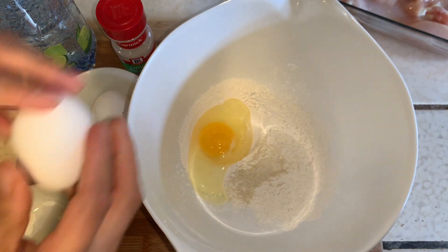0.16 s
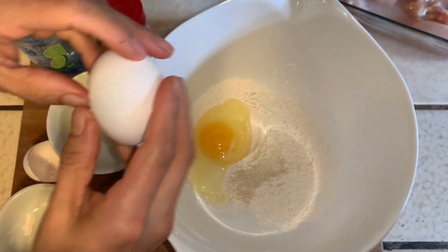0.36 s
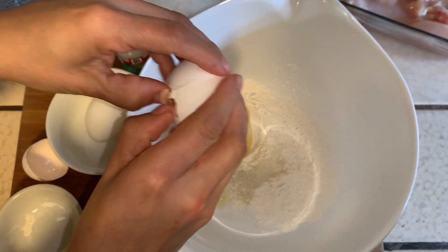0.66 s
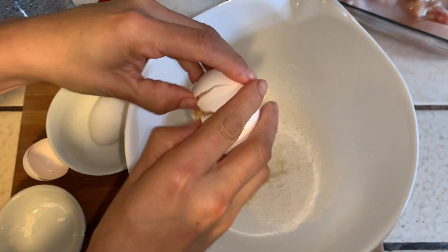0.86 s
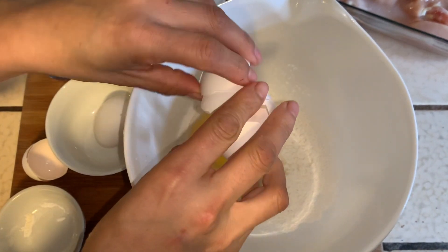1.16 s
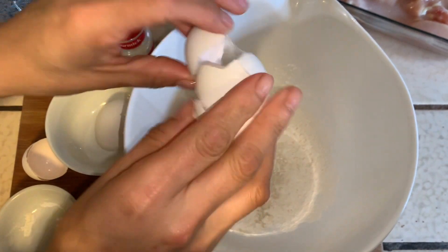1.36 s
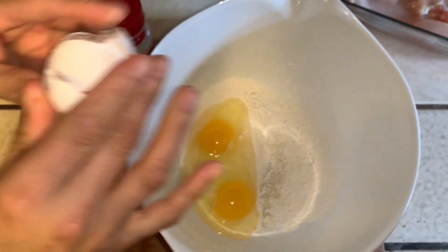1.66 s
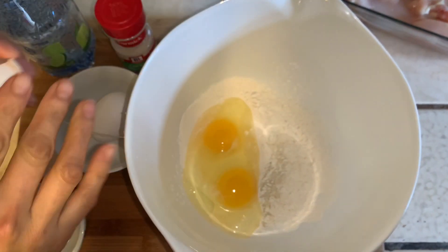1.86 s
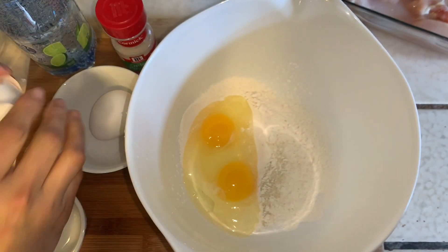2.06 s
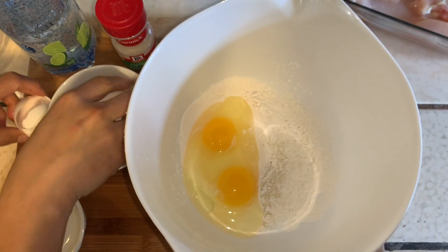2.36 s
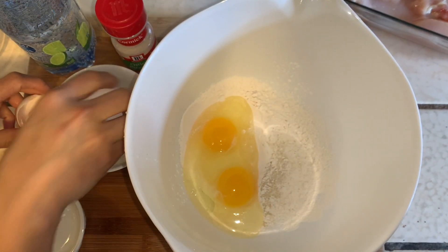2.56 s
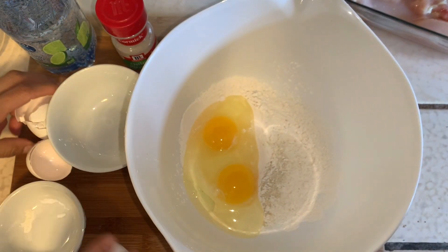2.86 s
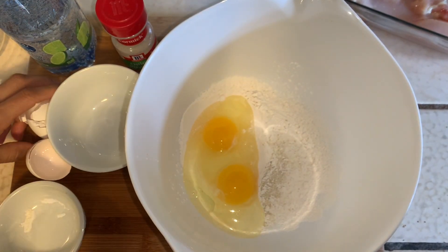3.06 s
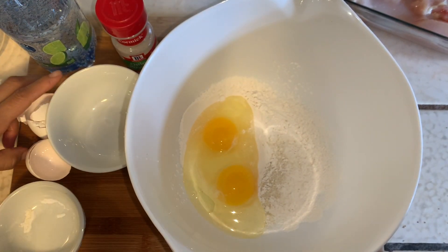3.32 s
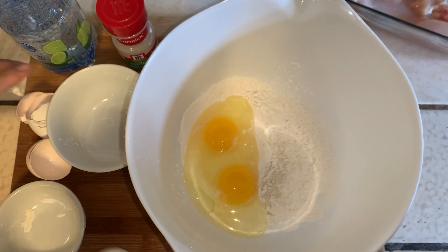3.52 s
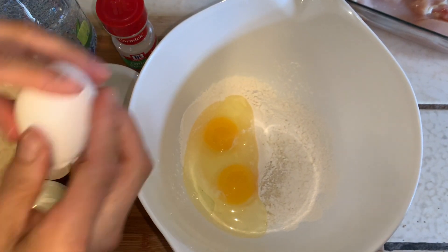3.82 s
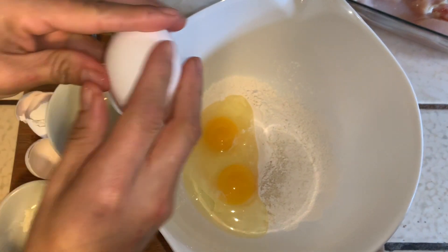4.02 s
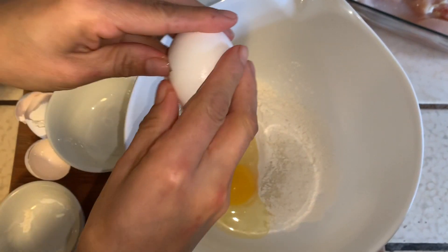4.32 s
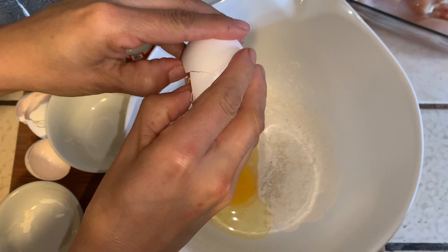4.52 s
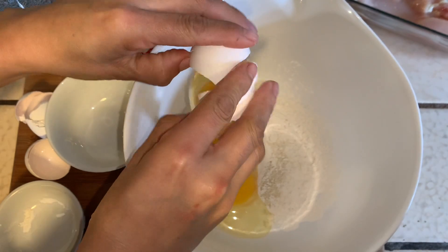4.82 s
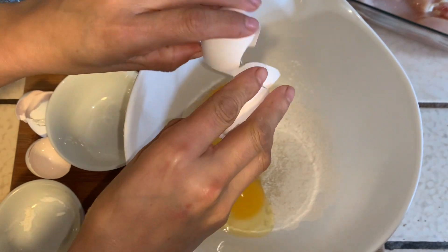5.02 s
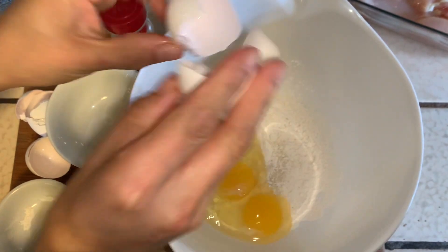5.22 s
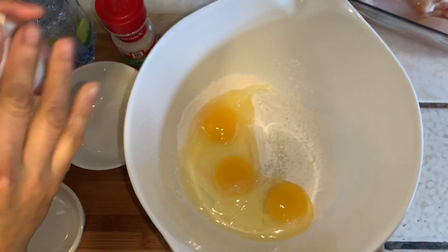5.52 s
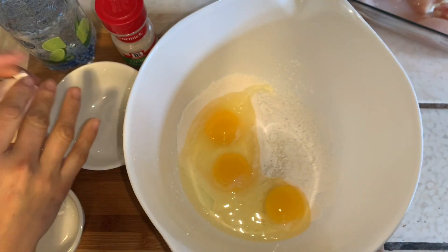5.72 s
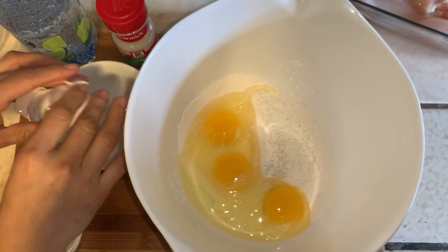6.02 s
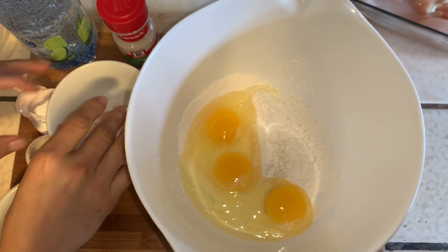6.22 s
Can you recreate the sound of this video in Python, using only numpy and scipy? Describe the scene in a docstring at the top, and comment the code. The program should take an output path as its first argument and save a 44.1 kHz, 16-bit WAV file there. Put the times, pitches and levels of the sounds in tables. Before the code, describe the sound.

Close, brittle eggshell snaps and rasps, a brief lull, three solid egg taps, then more splitting shells, soft bumps and a tiny bowl clink.

```python
"""Eggs cracked in a quiet kitchen

An egg is knocked three times on the counter; hands split shells with sharp snaps, crunches, rasps and crackle.
Breaks are noise bursts that drive shell resonances; knocks excite egg, board and counter modes.
Soft bumps, one bowl clink and a short room tail join them over low rumble and hiss; the loudest peaks clip."""
import sys
import numpy as np
from scipy import signal
from scipy.fft import rfft, irfft, next_fast_len
from scipy.io import wavfile
from scipy.ndimage import map_coordinates

SR = 44100
rng = np.random.default_rng(int(sys.argv[2]) if len(sys.argv) > 2 else 0)


def master(y):
    """Save y as 16-bit WAV."""
    cut = np.clip(np.atleast_2d(y).T, -1, 1)
    pcm = np.round(cut * 32767)  # scale
    wavfile.write(sys.argv[1], SR, pcm.astype(np.int16))


N = 281344

# Event level_db is the peak before the stereo stage; rise_s is the time of a 20 dB rise.
# Building rumble spectrum: freq_hz, density_db (relative, per Hz)
RUMBLE_SPECTRUM = [(12, -66), (20, -42), (38, -6), (90, -2), (136, -10), (171, -25.5), (221, -19.5),
                   (376, -25.5), (422, -31), (544, -26.5), (702, -43.5), (905, -36.5), (1580, -47),
                   (1730, -50.5), (5000, -68.5), (6500, -82), (11000, -120)]
RUMBLE_RMS_DB, HISS_RMS_DB, SWELL_RATE_HZ = -29, -60, 6
# Room decay: freq_hz, t60_s
ROOM_DECAY = [(150, 0.29), (1000, 0.31), (4000, 0.37), (12000, 0.16)]
# Small glazed bowl: freq_hz, level_db, t60_s
BOWL_MODES = [(4510, -34, 0.63), (8100, -28, 0.11)]
CLINK_START_S = 6.209
# Soft bumps and brushes of hands and bowls on the board, and empty shell halves set down on each other near
# 5.7-6.1 s: peak_s, level_db, nominal_pitch_hz, rise_s, t60_s
SOFT_BUMPS = [(.825, -27, 470, 0.0016, 0.22), (1.537, -26.5, 304, 0.0029, 0.053),
              (1.994, -41.5, 1830, 0.033, 0.18), (4.385, -24.5, 326, .003, 0.07),
              (4.745, -32, 500, .002, 0.078), (4.889, -26.5, 360, 0.0027, 0.12),
              (5.04, -32, 1050, 0.14, 0.31), (5.608, -35, 535, 0.04, 0.17),
              (5.618, -18.5, 235, 0.058, 0.14), (5.71, -16.5, 590, 0.0011, 0.045),
              (5.723, -15.5, 960, 0.0031, 0.1), (6.061, -10, 525, 0.0013, 0.058),
              (6.063, -13, 1310, 0.0033, .06), (6.11, -10.5, 1280, 0.00205, 0.082)]

# Egg against the counter: contact_s, level_db, thud_rel_db, board_rel_db, slap_rel_db
EGG_KNOCKS = [(2.965, 10, -12, -7.5, -21.5), (3.148, 4, -9, 0, -9), (3.333, -5.5, 1.5, 1, -11)]
# Slab and cabinet: freq_hz, mean_level_db, undamped_t60_s
SLAB_MODES = [(69, -4.5, 0.19), (98.4, 1.5, 0.2), (116.5, -10.5, 0.4), (170, -0.5, 0.21)]
# Egg and counter surface: freq_hz, level_db, t60_s
SURFACE_MODES = [(910, -2, 0.024), (1065, 9, 0.033), (1173, 10.5, 0.027), (1405, -2, 0.12),
                 (1550, -13, 0.028), (1820, -25, 0.018), (2180, -30, 0.036)]
# Cutting board: freq_hz, level_db, t60_s
BOARD_MODES = [(216, -8, 0.074), (311, -1, 0.057), (399, 4, 0.039), (463, 1.5, 0.04), (610, -31, 0.024),
               (752, -18, 0.013)]

# Hands at work, one list per egg: time_s, bright_crackle_db, hollow_crackle_db, cavity_hz
HANDLING = [
    [(0, -66, -52.5, 2520), (.17, -63, -49, 2080), (.32, -80, -68, 1440), (.4, -56, -47.5, 2770),
     (.57, -55, -38.5, 2130), (.77, -55.5, -37, 2410), (.9, -63.5, -44, 1770), (1.03, -35.5, -40, 1565),
     (1.1, -44, -51, 1600), (1.2, -38, -31.5, 1800), (1.35, -46, -42.5, 1670), (1.5, -34, -23, 1750),
     (1.62, -53, -50.5, 1980), (1.72, -28, -48.5, 2060), (1.8, -83, -74, 2180), (1.95, -61, -69.5, 1770),
     (2.1, -65, -63, 1760), (2.2, -66, -52, 2250), (2.32, -39, -37.5, 2060), (2.45, -71, -65, 1580),
     (2.93, -84.5, -56, 1700)],
    [(3.6, -70, -65.5, 1515), (3.85, -63, -68, 2840), (4.08, -65, -89, 1610), (4.14, -60, -31, 3200),
     (4.24, -76, -88, 1700), (4.33, -59, -41, 2850), (4.45, -67, -46.5, 2500), (4.5, -59, -52, 3200),
     (4.6, -60, -44, 2720), (4.72, -56, -40, 1570), (4.83, -63, -53, 1520), (4.92, -63, -46, 2890),
     (5.05, -41.5, -39, 2460), (5.13, -68, -69, 1990), (5.27, -31, -32, 2750), (5.4, -47.5, -35, 2710),
     (5.5, -39, -53, 2240), (5.6, -61.5, -46, 2130), (5.76, -38, -25.5, 2200), (5.91, -70, -53, 2000),
     (6.0, -80, -41.5, 2600), (6.11, -38, -32.5, 2400), (6.24, -64, -35.5, 2540), (6.3, -79, -46.5, 2340)],
]
# Bright break spectrum: freq_hz, gain_db
CRACK_SPECTRUM = [(1500, -29), (4500, -7), (5400, -11.5), (6300, -1.5), (8500, 4), (11000, 3), (13500, 3.5),
                  (16000, -0.5)]
# Hollow crackle spectrum, ahead of the cavity: freq_hz, gain_db
HOLLOW_SPECTRUM = [(500, -97), (1000, -3.5), (1600, 15), (2400, -19), (3300, 8), (4700, 4), (7000, 12)]

# Sudden shell breaks: peak_s, level_db, ring_rel_db, ring_pitch_hz, crack_t60_s
SHELL_SNAPS = [(0.0447, -11, -13, 3340, 0.013), (.0913, -17.5, -14, 4670, .016),
               (0.2195, -28.5, -5, 1100, .011), (.3474, -21.5, -37, 1270, .007),
               (0.3692, -15.5, -17, 1180, 0.0091), (0.3871, -5.5, -13.5, 2700, .007),
               (0.3908, -2, -16.5, 2800, .006), (0.4027, -6, -17, 3280, .009),
               (0.4228, -13.5, -14, 1260, .01), (0.4927, -24, -12, 2270, .013),
               (0.5162, -10, -17, 1490, 0.018), (0.544, -6.5, -14.5, 2130, 0.028),
               (0.551, -1, -16, 2520, 0.035), (.6004, -19, -14, 1325, 0.014),
               (0.6128, -11.5, -20, 1530, 0.015), (.6291, -16.5, -22, 2520, 0.0082),
               (0.6606, -23, -12.5, 1110, .009), (0.671, -15, -19, 2350, .014), (0.69, 4, -30, 1370, 0.02),
               (0.701, -9.5, -17, 2290, 0.025), (0.737, -9.5, -15.5, 2230, 0.0071),
               (0.7646, -12.5, -17, 2200, .024), (0.8221, -4, -1, 2370, 0.067),
               (0.8266, 1.5, -9, 2210, 0.017), (0.8618, 0.5, -19, 2300, 0.0076),
               (0.8652, 2, -19, 2326, 0.016), (.952, -14.5, -10.5, 1530, 0.005),
               (.9573, -13, -40, 1450, .016), (0.995, -9.5, -8.5, 1650, 0.046),
               (1.0085, -5.5, -16, 1630, .009), (1.0593, -8, -8, 4550, 0.014),
               (1.122, -9.5, -19, 1520, 0.026), (1.1428, -11.5, -22, 1940, .008),
               (1.1833, -18.5, -9.5, 1980, 0.011), (1.202, -15.5, -6.5, 1900, 0.039),
               (1.2172, -5, -31, 1900, 0.011), (1.221, -2, -18.5, 1980, 0.015),
               (1.28, -14, -18, 3250, 0.0083), (1.3157, 6, -22.5, 1880, 0.011),
               (1.3853, -13, -13, 1720, 0.074), (1.408, -3.5, -18, 1530, 0.048),
               (1.466, -1.5, -25, 1700, 0.013), (1.482, -12, -3.5, 1470, 0.017),
               (1.4881, -10, -9.5, 3380, 0.044), (1.5379, 7, -11.5, 1880, 0.019),
               (1.569, -8, -29, 1750, 0.008), (1.5852, -8.5, -15, 1940, 0.011),
               (1.7292, -7.5, -9, 1780, 0.05), (2.222, -27, -11, 2300, 0.022),
               (2.3168, -19, -2.5, 1990, 0.047), (2.4577, -32, -14, 1330, 0.0097),
               (2.679, -34.5, -5, 1170, 0.0086), (2.9642, 3.5, -8, 1210, 0.036),
               (3.151, 7, -3.5, 1300, 0.031), (3.3329, -0.5, -8, 1280, 0.039),
               (3.696, -18.5, -18, 1560, .01), (3.7472, -27, -22, 1240, 0.0077),
               (3.8349, -25.5, -12, 1100, .028), (4.0357, -29, -14, 1180, .008),
               (4.1046, -22, -28, 1180, .012), (4.1222, -8, -25, 1090, .01),
               (4.1315, -12.5, -23, 1090, 0.0071), (4.1491, -5.5, -18, 3980, 0.0099),
               (4.176, -14, -24, 3080, 0.0061), (4.1907, -22.5, -16.5, 1120, .016),
               (4.3118, -22, -27, 1130, 0.01), (4.3292, -12, -32, 3920, 0.011),
               (4.3376, -7, -38, 3900, 0.0095), (4.3481, -11, -23, 4060, 0.0076),
               (4.3788, 7.5, -20.5, 3250, 0.011), (4.3869, 3.5, -22.5, 3420, .026),
               (4.4084, -12, -33, 3600, 0.011), (4.432, -7, -19, 1740, 0.028),
               (4.4457, -11.5, -27, 3480, 0.021), (4.5487, -8, -22, 3600, 0.0063),
               (4.5722, -18, -12, 4110, .008), (4.581, -15, -14.5, 990, 0.056),
               (4.6058, 1.5, -46, 3920, 0.021), (4.6136, -3, -33, 3850, .019),
               (4.6749, -21.5, -5.5, 1910, .018), (4.6853, -9.5, -18, 1830, 0.021),
               (4.7232, -12.5, -14, 1310, 0.018), (4.7437, 2, -11, 1510, 0.038),
               (4.7584, -4, -21, 1500, 0.015), (4.849, -21, -32, 1430, .011),
               (4.8875, -22.5, 3.5, 2720, 0.024), (4.8982, -13.5, -25, 2630, 0.029),
               (4.96, -14.5, -2, 3630, 0.0096), (5.002, -7.5, -22, 2400, 0.011),
               (5.0594, -17.5, -20, 4500, .015), (5.0949, -14.5, -42, 1120, 0.0067),
               (5.1433, -24, -23, 1210, .01), (5.1837, -7.5, -18.5, 4570, 0.043),
               (5.229, -8, -16, 3340, .024), (5.247, -6, -26, 2540, .012), (5.3585, 0.5, -34, 2200, 0.0092),
               (5.382, -11, -13, 4030, 0.013), (5.393, 2.5, -32, 2350, 0.022),
               (5.4582, -6.5, -31, 2170, 0.01), (5.6785, -4, -9, 2400, 0.026), (5.7096, 3, -8, 2350, .04),
               (5.7773, -7.5, -15, 2390, 0.0066), (5.877, -15, -8, 1910, 0.009),
               (5.949, -16.5, -16, 1940, 0.03), (6.0263, -9, -9, 2680, .031), (6.059, 10, 4, 2626, 0.0098),
               (6.1095, 5, -6.5, 2470, 0.034), (6.2091, -2, -23, 4370, 0.032), (6.179, -26, 5, 2220, .027),
               (6.244, -19.5, -5.5, 2320, 0.033)]
# Grinding shell edges that swell in: peak_s, level_db, ring_rel_db, ring_pitch_hz, crack_t60_s
SHELL_CRUNCHES = [(0.1946, -29, -5.5, 1810, .027), (0.806, -15.5, -1.5, 2700, 0.038),
                  (0.841, 0.5, -8.5, 1700, 0.023), (0.8556, -4, -8.5, 1880, 0.022),
                  (0.878, -12, -21, 1910, 0.0063), (1.0541, -10, -10, 1420, 0.02),
                  (1.238, -11, -14, 1700, .03), (1.2898, -3.5, -18, 2200, 0.012),
                  (1.3051, -6, -15.5, 1570, 0.078), (1.4245, -6.5, -12, 1630, 0.032),
                  (1.5328, -8, -2, 1440, 0.011), (1.6572, -11.5, -11.5, 1675, 0.033),
                  (1.7126, -17.5, -3, 1810, .015), (2.286, -28, -3, 1330, 0.015),
                  (4.3927, -6, -39, 3510, 0.018), (4.512, -15, -21, 3470, 0.017),
                  (4.6332, -14, -9, 4300, 0.026), (4.6443, -15.5, -10, 3200, 0.029),
                  (5.0108, -15.5, -7, 2330, 0.036), (5.0237, -10, -19, 2370, .015),
                  (5.078, -10.5, -23.5, 1140, .016), (5.257, -13, -2.5, 2800, 0.024),
                  (5.333, -14, -5, 2570, 0.022), (5.4002, -2, -11.5, 2370, 0.045),
                  (5.4423, -12.5, -7.5, 2600, 0.017), (5.6434, -20.5, -1, 2370, .02),
                  (5.722, -6, -1, 2100, 0.014), (5.8413, -14.5, -2, 2440, 0.036),
                  (5.9863, -23.5, -17, 4370, 0.024), (6.0614, -3, 2.5, 2610, 0.023),
                  (6.079, -22, 12, 2770, .025), (6.1499, -9, -10, 2540, 0.037)]
# Shell halves dragged along each other: start_s, length_s, typical_level_db, ring_rel_db, typical_pitch_hz
SHELL_SCRAPES = [(1.655, .04, -26, -6.5, 1680), (1.7, 0.073, -14.5, -14.5, 1700),
                 (1.74, 0.03, -23.5, -7, 3280), (2.15, 0.086, -34, -1.5, 2220), (2.27, 0.11, -34, -4, 1950),
                 (5.26, .09, -14.5, -5, 2800), (5.425, 0.031, -16, -10, 2500),
                 (5.52, 0.033, -12, -7.5, 2300), (5.725, 0.024, -17.5, -3, 2170)]
# Half-shell resonances: pitch_ratio, ungripped_relative_width, gain_db
SHELL_MODES = [(.55, 0.18, -7), (1, 0.12, 9), (1.33, 0.16, -7.5), (1.85, 0.17, -10.5)]
# What a break feeds into the shell: freq_hz, gain_db
PUSH_SPECTRUM = [(200, -55.5), (900, 4), (4000, 3.5), (7000, -8), (16000, -24)]
BURST_LEAD_S = .03  # start of a burst to its peak
SNAP_RISE_S, CRUNCH_RISE_S = 0.00091, 0.012
SCATTER_REL_DB, SCATTER_EXTRA_T60_S = -21, .03
CATCHES_PER_SCRAPE = 7
CATCH_T60_S, CATCH_RISE_S, CATCH_SPREAD_DB = 0.018, 0.0019, 3.5
CHIP_SLOTS = 220  # spread over the whole time; only those during handling sound
CHIP_OVER_BRIGHT_DB, CHIP_RANGE_DB = 14, 4.5  # smallest peak over bright crackle; range above it
CHIP_RING_REL_DB, CHIP_T60_S, CHIP_RISE_S = -16.5, 0.024, 0.0022  # typical values
CHIP_T60_LOG_SPREAD = 0.76

# Left-right likeness: freq_hz, correlation
LIKENESS = [(60, 0.98), (150, .9), (350, 0.51), (800, 0.057), (1500, 0.033), (4500, 0.033), (6200, 0.92),
            (16000, 1)]
# Level lean: freq_hz, left_minus_right_db
LEVEL_LEAN = [(40, -2.5), (120, -1.3), (500, 1.5), (2000, 0)]
IN_STEP_HZ, TURN_HZ = 10950, 4950  # sides agree in phase here, and again after each turn
TOP_HZ = 15850


def amp(db):
    """Gain of a dB value."""
    return 10 ** (np.asarray(db) / 20)


def unit(x):
    """Scaled to rms 1."""
    return x / np.sqrt(np.mean(x ** 2) + 1e-20)


def along(points, hz):
    """Interpolation of (freq_hz, value) points on a log axis."""
    f, v = np.transpose(points)
    return np.interp(np.log(hz + 1), np.log(f + 1), v)


def filtered(x, response):
    """x times a complex response of frequency."""
    n = x.shape[-1]
    m = next_fast_len(n + min(n // 4, 8192))
    return irfft(rfft(x, m) * response(np.fft.rfftfreq(m, 1 / SR)), m)[..., :n]


def coloured(x, points):
    """x through a smooth (freq_hz, gain_db) spectrum."""
    return filtered(x, lambda hz: amp(along(points, hz)))


def laid(times_s, sounds, lead_s=0):
    """Sounds (events, 2, samples) summed at their times, each starting lead_s early."""
    out = np.zeros((2, SR + N + sounds.shape[-1]))  # one spare second in front
    for time_s, sound in zip(times_s, sounds):
        start = round((1 + time_s - lead_s) * SR)
        out[:, start:][:, :sound.shape[-1]] += sound
    return out[:, SR:SR + N]


def peaked(x, db):
    """Each event scaled to its peak level."""
    return x / np.abs(x).max(axis=(1, 2), keepdims=True) * amp(db)[:, None, None]


def puffs(rise_s, t60_s, seconds, scatter=0):
    """Noise bursts, two independent channels: up 20 dB in rise_s to a peak at BURST_LEAD_S, then dying."""
    t = np.arange(round((BURST_LEAD_S + seconds) * SR)) / SR - BURST_LEAD_S
    rise, t60 = np.clip([rise_s, t60_s], .0003, 1)[:, :, None, None]
    climb = amp(-20 * np.abs(t) / rise)
    fall = amp(-60 * np.abs(t) / t60)
    fall = fall + scatter * amp(-60 * np.abs(t) / (t60 + SCATTER_EXTRA_T60_S))
    noise = rng.standard_normal((len(t60), 2, len(t)))
    return noise * np.where(t < 0, climb, fall)


def rung(x, hz, modes, spread=1):
    """Each event through resonances (ratio, relative width, dB) on its own pitch, widened by spread."""
    def response(f):
        u = f / hz[:, None, None]
        total = 0
        for ratio, width, db in modes:
            loss = 1j * u * ratio * width * spread
            total = total + amp(db) * loss / (ratio * ratio - u * u + loss)
        return total
    return filtered(x, response)


def background():
    """Building rumble, slowly swelling, over microphone hiss."""
    knots = rng.standard_normal(round(N * SWELL_RATE_HZ / SR) + 4)
    swell = map_coordinates(knots, [np.arange(N) * SWELL_RATE_HZ / SR])
    rumble = unit(coloured(rng.standard_normal((2, N)), RUMBLE_SPECTRUM) * amp(1.2 * swell))
    return amp(RUMBLE_RMS_DB) * rumble + amp(HISS_RMS_DB) * rng.standard_normal((2, N))


def kitchen(x):
    """Room tail: noise in which each frequency dies at its own speed."""
    hz, t, z = signal.stft(rng.standard_normal((2, SR // 2)), SR, nperseg=256)
    decay = amp(-60 * t / along(ROOM_DECAY, hz)[:, None])
    tail = signal.istft(z * decay, SR, nperseg=256)[1]
    delayed = np.pad(x, ((0, 0), (200, 0)))  # samples
    return signal.fftconvolve(delayed, tail / np.linalg.norm(tail[0]), axes=1)[:, :N]


def clink():
    """A shell edge touches the glazed rim: the bowl's modes ring as decaying sines."""
    t = np.arange(SR // 4) / SR
    ring = sum(amp(db - 60 * t / t60) * np.sin(2 * np.pi * hz * t) for hz, db, t60 in BOWL_MODES)
    return laid([CLINK_START_S], ring * np.ones((1, 2, 1)))


def bumps():
    """Dull contacts: noise bursts through two broad resonances, without a clear ring."""
    peak_s, db, hz, rise, t60 = np.transpose(SOFT_BUMPS)
    dull = rung(puffs(rise, t60, 0.2), hz, [(0.91, 0.66, 0)])
    dull = rung(dull, hz, [(0.77, 1.5, 0)])
    return laid(peak_s, peaked(dull, db), BURST_LEAD_S)


def ringing(modes, t, damping, attack_s):
    """Slab modes at varied strengths, starting from rest; mostly common to both sides."""
    hz, db, t60 = np.transpose(modes)[:, :, None, None]
    varied_db = db + rng.normal(0, 1.2, (len(modes), 1, 1))
    level = amp(varied_db - 60 * t / (damping * t60))
    tone = (level * np.sin(2 * np.pi * hz * t)).sum(axis=0)
    return tone * (1 - np.exp(-t / attack_s)) * [[1], [.3]]  # common, apart


def struck(modes, contact_s):
    """A crumbling contact drives modes (freq_hz, level_db, t60_s) with fresh noise at each knock."""
    each = np.ones(len(EGG_KNOCKS))
    resonances = []
    for hz, db, t60 in modes:
        width = np.log(1000) / (np.pi * t60 * hz)
        resonances.append((hz, width, db + 20 * np.log10(t60)))
    return rung(puffs(0.0024 * each, contact_s * each, .3), each, resonances)


def knocks():
    """Egg and board answer at once; the heavy counter swings in a little later."""
    contact_s, db, thud_db, board_db, slap_db = np.transpose(EGG_KNOCKS)
    t = np.arange(SR // 3) / SR
    thud = np.array([ringing(SLAB_MODES, t, 0.54, 0.0056) for _ in contact_s])
    slap = struck([(3220, 0, 0.0003)], 0.11)
    quick = peaked(struck(SURFACE_MODES, 0.039), db)
    quick = quick + peaked(struck(BOARD_MODES, 0.045), db + board_db)
    quick = quick + peaked(slap, db + slap_db)
    return laid(contact_s, peaked(thud, db + thud_db)) + laid(contact_s, quick, BURST_LEAD_S)


def handling(t):
    """Bright dB, hollow dB and cavity Hz at times t, and whether hands are on a shell."""
    time_s, *columns = np.vstack(HANDLING).T
    busy = sum((t > egg[0][0]) & (t < egg[-1][0]) for egg in HANDLING)
    return [np.interp(t, time_s, column) for column in columns] + [busy]


def crackle():
    """Unequal tiny breaks ride on skin-on-shell hiss; the cavity between hands and shell colours them."""
    ticks = (rng.random(N) < 500 / SR) * amp(5.23 * rng.exponential(size=N))  # 500 per second
    grain = signal.lfilter([1], [1, -amp(-60 / (0.017 * SR))], ticks)  # tick t60 17 ms
    bed = (0.2 + unit(grain)) * rng.standard_normal((2, 2, N))
    bright_db, hollow_db, _, busy = handling(np.arange(N) / SR)
    f, frames_s, z = signal.stft(coloured(bed[1], HOLLOW_SPECTRUM), SR, nperseg=256)
    off = np.log((f[:, None] + 1) / handling(frames_s)[2]) / .14
    # second cavity mode a little under twice the first
    cavity = amp(-17) + np.exp(-off ** 2 / 2) + amp(-4) * np.exp(-(off - 4.4) ** 2 / 2)
    hollow = signal.istft(z * cavity, SR, nperseg=256)[1][:, :N]
    bright = unit(coloured(bed[0], CRACK_SPECTRUM))
    return busy * (amp(bright_db) * bright + amp(hollow_db) * unit(hollow))


def chips():
    """Rows for small chance breaks: level follows the handling, ring lies near the cavity pitch."""
    place, size = rng.random((2, CHIP_SLOTS))
    vary = rng.standard_normal((4, CHIP_SLOTS))
    peak_s = (np.arange(CHIP_SLOTS) + place) * N / SR / CHIP_SLOTS
    bright_db, _, cavity_hz, busy = handling(peak_s)
    level_db = bright_db + CHIP_OVER_BRIGHT_DB + CHIP_RANGE_DB * size ** 2
    ring_db = CHIP_RING_REL_DB + 4 * np.tanh(vary[0])
    pitch_hz = cavity_hz * np.exp(0.11 * vary[1])
    t60_s = CHIP_T60_S * np.exp(CHIP_T60_LOG_SPREAD * vary[2])
    rise_s = CHIP_RISE_S * np.exp(vary[3])
    return np.transpose([peak_s, level_db, ring_db, pitch_hz, t60_s, rise_s])[busy > 0]


def catches():
    """Rows for the uneven catches of shell edges that make up each scrape."""
    start_s, length_s, db, ring_db, hz = np.repeat(SHELL_SCRAPES, CATCHES_PER_SCRAPE, axis=0).T
    place, size, pitch = rng.standard_normal((len(start_s), 3)).T
    index = np.arange(len(start_s)) % CATCHES_PER_SCRAPE
    share = (index + 0.14 * place) / (CATCHES_PER_SCRAPE - 1)
    same = np.ones(len(start_s))
    return np.transpose([start_s + share * length_s, db + CATCH_SPREAD_DB * size, ring_db,
                         hz * np.exp(.1 * pitch), CATCH_T60_S * same, CATCH_RISE_S * same])


def snaps():
    """Shell breaks crack brightly and scatter off hands and bowl; the hollow half rings at its own pitch."""
    loud = [row + (SNAP_RISE_S,) for row in SHELL_SNAPS]
    loud += [row + (CRUNCH_RISE_S,) for row in SHELL_CRUNCHES]
    peak_s, db, ring_db, hz, t60, rise = np.vstack([loud, catches(), chips()]).T
    burst = puffs(rise, t60, .05, amp(SCATTER_REL_DB))
    burst[:, 0, round(BURST_LEAD_S * SR)] += 7 * np.exp(-rise / 0.00099)  # spike of a sudden break
    crack = peaked(coloured(burst, CRACK_SPECTRUM), db)
    gripped = amp(np.clip(-.7 * (ring_db + 5), 0, 14))  # fingers that mute the ring also blur and shorten it
    push = coloured(puffs(rise, 1.57 * t60 + 0.031 / gripped, .05), PUSH_SPECTRUM)
    ring = peaked(rung(push, hz, SHELL_MODES, gripped[:, None, None]), db + ring_db)
    return laid(peak_s, crack + ring, BURST_LEAD_S)


def scene():
    """Handling, room and background; channel 0 is common to both sides, channel 1 sets them apart."""
    shell, blows = snaps() + bumps(), knocks()
    room = amp(-11) * kitchen(shell) + amp(-9.5) * kitchen(blows)
    return shell + blows + room + clink() + crackle() + background()


def record(dry):
    """Stereo pair: bass and treble mostly common, right treble a fifth of a millisecond early; peaks clip."""
    def mix(hz):
        turn = np.arccos(np.clip(along(LIKENESS, hz), -1, 1)) / 2
        return [np.cos(turn), np.sin(turn)]

    def sides(hz):
        phase = np.pi * np.maximum(hz - IN_STEP_HZ + TURN_HZ, 0) / TURN_HZ
        lean = amp(np.outer([.5, -.5], along(LEVEL_LEAN, hz)))
        return np.exp(1j * np.outer([-1, 1], phase)) * lean

    common, apart = filtered(dry, mix)
    pair = filtered(np.array([common + apart, common - apart]), sides)
    pair = filtered(pair, lambda hz: (1j * hz / (24 + 1j * hz)) ** 2)  # small microphones lose the deepest bass
    clipped = pair / (1 + np.abs(pair) ** 12) ** (1 / 12)
    return filtered(clipped, lambda hz: amp(np.interp(hz - TOP_HZ, [-250, 50, 650, 850], [0, -20, -26, -120])))


dry = scene()
out = record(dry)
master(out)
```